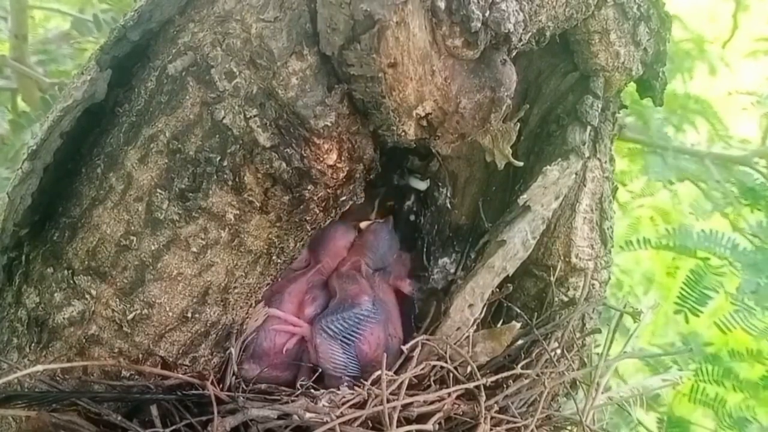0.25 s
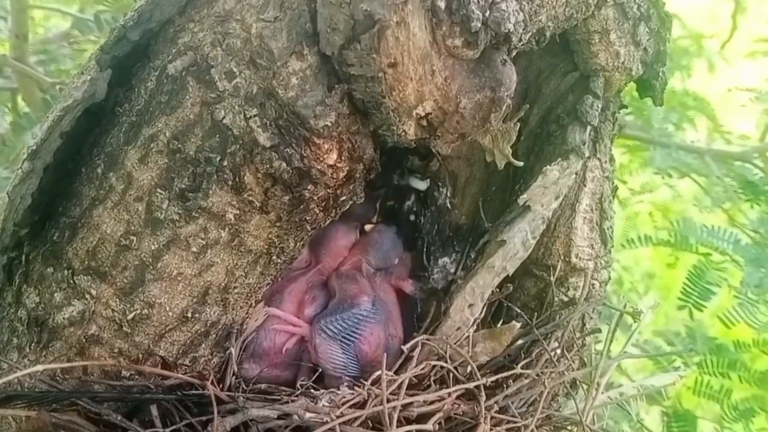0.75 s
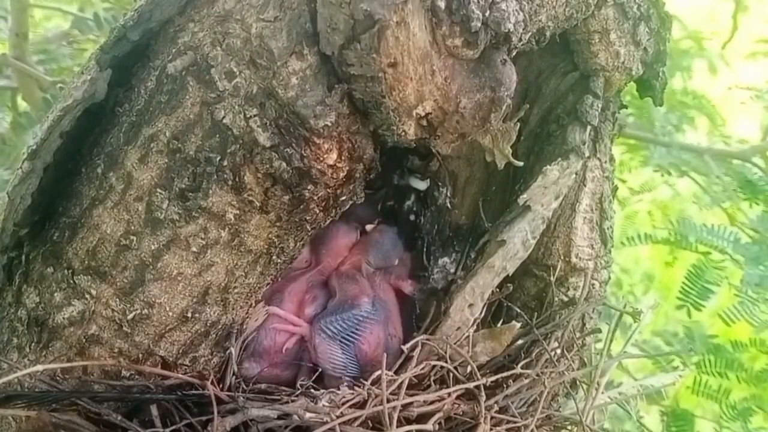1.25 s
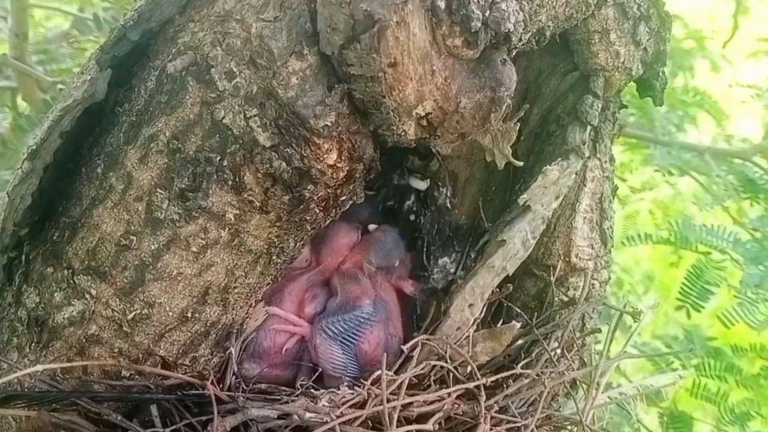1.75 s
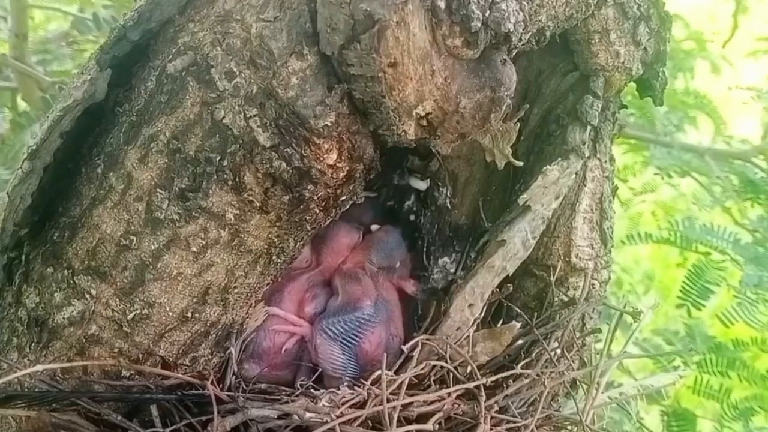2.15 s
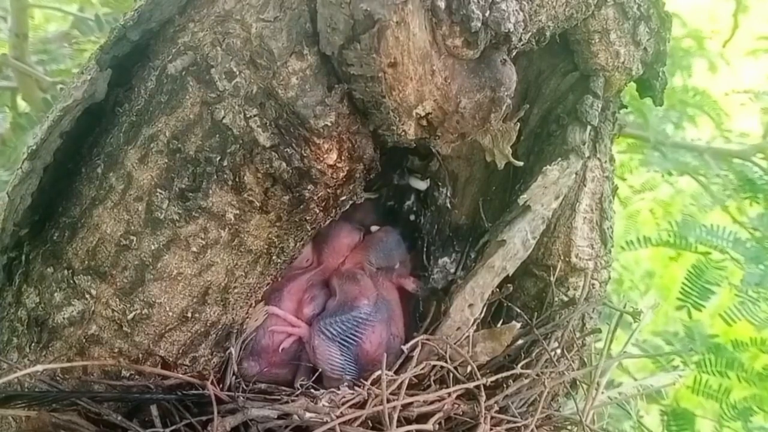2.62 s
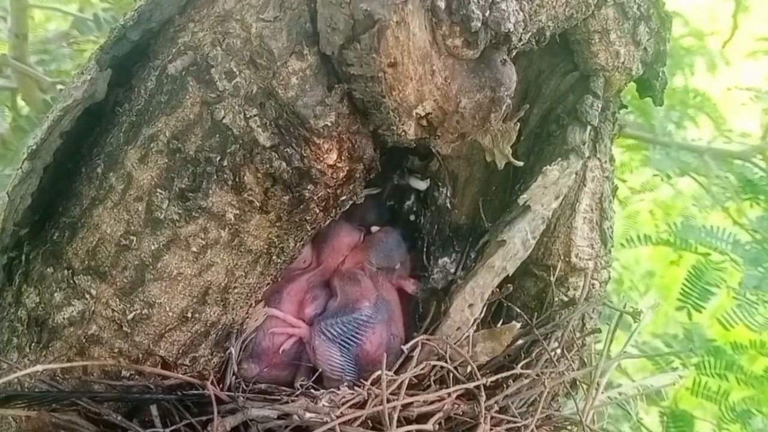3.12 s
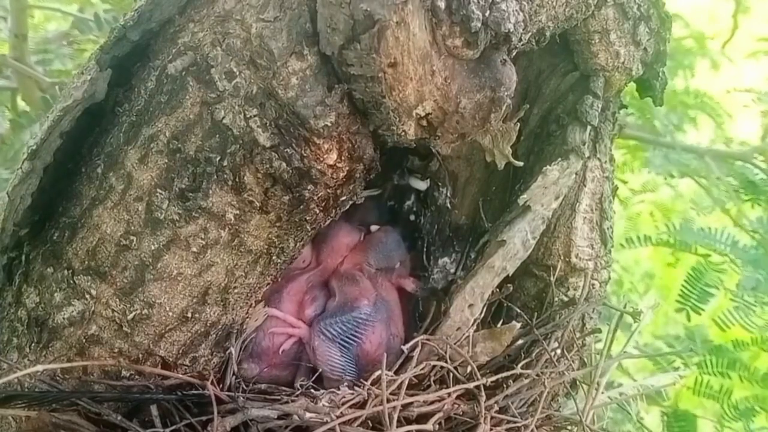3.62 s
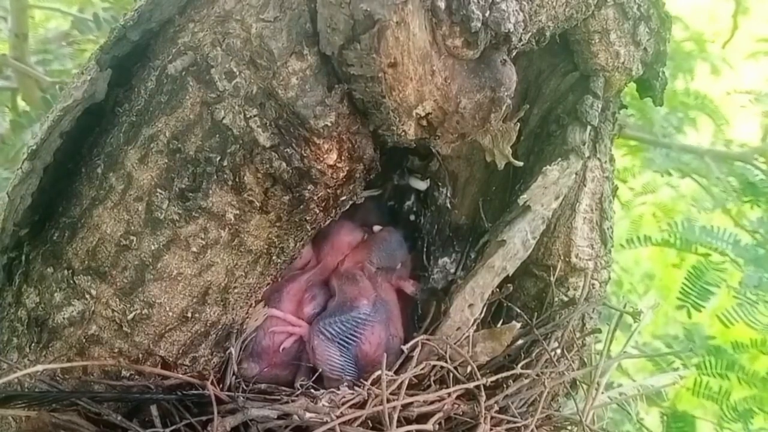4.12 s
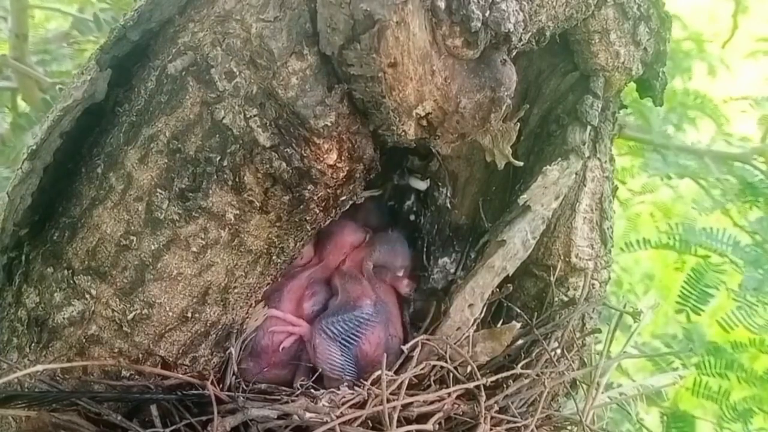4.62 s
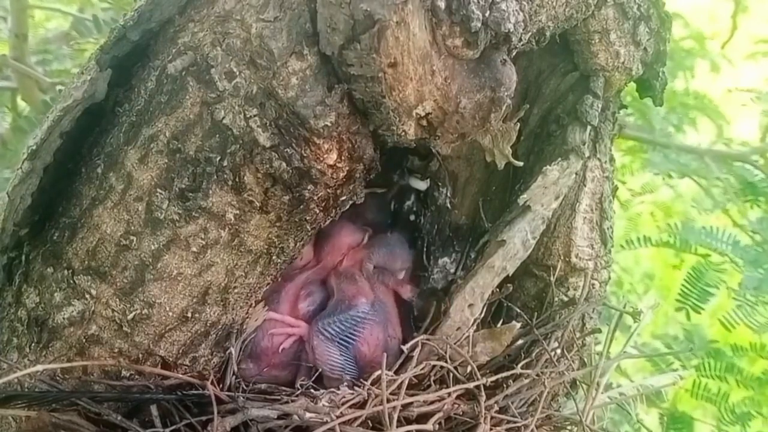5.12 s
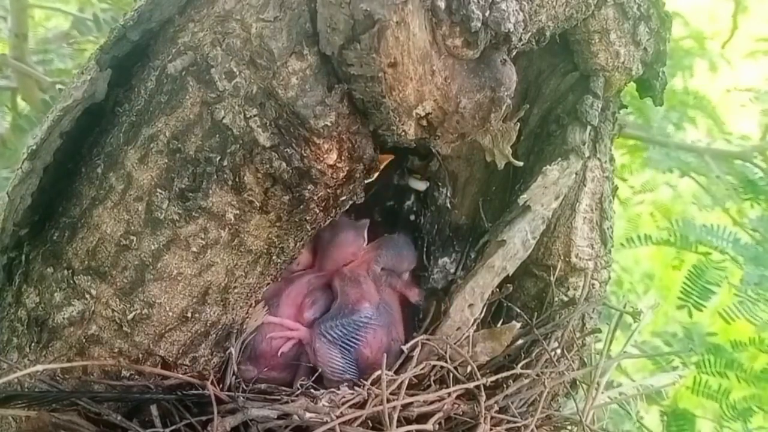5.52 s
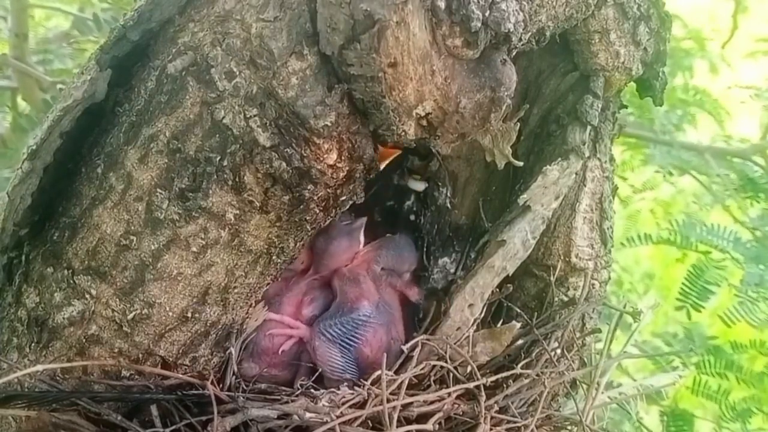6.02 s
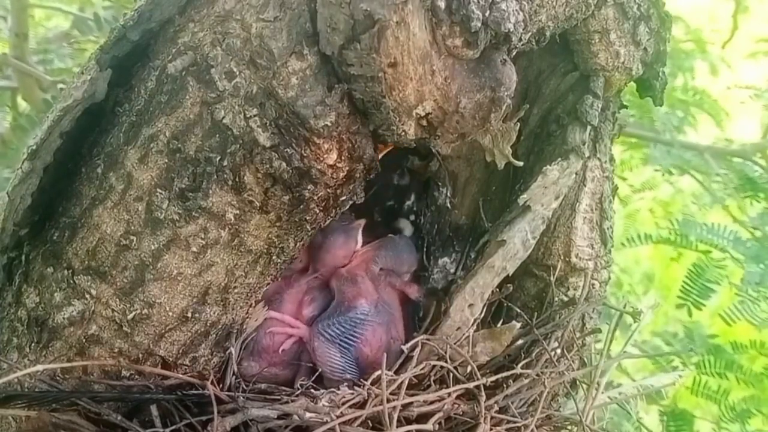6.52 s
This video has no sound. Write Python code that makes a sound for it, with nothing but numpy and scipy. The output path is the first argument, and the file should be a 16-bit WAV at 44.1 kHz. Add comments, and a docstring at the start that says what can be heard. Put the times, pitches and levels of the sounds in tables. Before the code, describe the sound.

Shrill cicadas hold a dense, steady sizzle, mixed with a rapid cricket trill and a very thin high whine. Birds come in over them: short buzzy bursts, a quick rasping chatter, then a long run of sharp repeated chirps, loudest just after its first second. Faint calls scatter among leaves behind. The microphone sits near the nest, catching low bumps and a few tiny dry twig ticks.

```python
"""Cicadas drone in a summer wood, heard from a nest in a hollow tree: streams of clicks ring in a set band.
A cricket pulses about ten times a second, as swells of clicks; a thin whine, a sine in narrow hiss, hangs above.
One bird chatters in runs of raspy notes, a higher one answers and others call farther off: their whistles
are shaken by a fast rattle and scattered by trunks and leaves. Twigs tick and scrape as brief bright noise.
Underneath lie a hush and a rumble, both shaped noise, and soft bumps made of short low tones."""
import sys
import numpy as np
from scipy import signal
from scipy.fft import rfft, irfft, next_fast_len
from scipy.io import wavfile
from scipy.ndimage import map_coordinates

SR = 44100
rng = np.random.default_rng(int(sys.argv[2]) if len(sys.argv) > 2 else 0)


def transcribe(u):
    """Save the signal u as a 16-bit wav file named by the first command-line argument.

    u: samples, shape (n,) or (channels, n), limited to [-1, 1]; the rate is SR.
    q: integer samples, one column per channel.
    """
    v = np.clip(np.atleast_2d(u).T, -1, 1)
    q = np.round(v * 32767).astype(np.int16)
    wavfile.write(sys.argv[1], SR, q)


N = 297675

# In every table a half length is the time from a sound's middle to where its swell has faded to 1/e.
# how the cicadas' bodies ring: [f/Hz, relative level/dB]
CICADA_BODY = [(5600, -65.5), (6450, -29.5), (6650, -30.5), (6790, -17), (6900, -11.5), (7150, -10),
               (7400, -6), (7680, 0), (7900, -2.5), (8200, -12.5), (8450, -24.5), (8600, -32),
               (8850, -44.5), (9100, -63)]
CHORUS_DB = -19.1
LONE_DB, LONE_FADE_DB_PER_S = -29.5, .55  # the lone cicada slowly tires
FALTERS_S, FALTER_DB, FALTER_HALF_S = [1.58, 3.64], 14, .11  # and dips deeply twice

# the cricket holds a pace for a while, then shifts: [start t/s, chirps per second]
CRICKET_PACE = [(.065, 9.85), (.776, 11.06), (1.499, 10.4), (3.902, 9.79), (4.924, 10.14), (5.811, 9.19),
                (6.246, 9.99)]
# how hard the cricket sings, before its gain: [t/s, level/dB]
CRICKET_LEVEL = [(.17, -28.5), (.45, -34), (.8, -30.5), (.96, -46), (1.06, -35), (1.55, -30), (1.95, -33.5),
                 (2.35, -30.5), (3.0, -36), (3.27, -32.5), (3.5, -38.5), (4.35, -36.5), (4.65, -33),
                 (5.7, -31.5), (6.1, -35.5), (6.75, -33)]
# how the cricket's wing rings: [f/Hz, relative level/dB]
WING = [(5500, -39.5), (5880, -13.5), (6020, -1), (6130, -1), (6240, -1), (6380, -35), (6600, -54)]
CRICKET_SPREAD_DB = 1.2  # from chirp to chirp

WHINE_HZ, WHINE_DB = 15736, -33

# the near bird's runs of raspy notes: [first note t/s, last note t/s]
CHATTER_RUNS = [(1.578, 1.85), (2.89, 5.994), (6.546, 6.722)]
# the near bird's effort, before its gain: [t/s, level/dB]
CHATTER_LEVEL = [(1.57, -35), (1.7, -29.8), (1.86, -28.3), (2.89, -32.5), (2.99, -25), (3.4, -24.5),
                 (3.78, -22.7), (4.0, -19), (4.2, -21), (5.35, -21.4), (6.0, -23), (6.75, -24)]
CHATTER_PER_S = 11.3
EASY_HZ, PUSH_ABOVE_DB, PUSH_HZ_PER_DB = 3690, -24.5, 42  # pushed harder, the notes go sharp
CHATTER_SPREAD_DB, CHATTER_SPREAD_HZ = .8, 30  # from note to note

# a second bird's bursts and single notes, before its gain: [first note t/s, length/s, level/dB, f/Hz]
ANSWERS = [(.2, 0, -47, 4670), (.49, 0, -47, 4700), (1.194, .136, -25, 4670), (2.489, .207, -24.5, 4635),
           (2.92, 0, -43.5, 4600), (3.236, 0, -38.5, 4600), (3.845, 0, -37, 4500), (4.216, .204, -26, 4650),
           (5.43, 0, -35, 4780), (5.941, 0, -32, 4620), (6.023, 0, -21, 4530), (6.536, 0, -27, 4390)]
ANSWER_PER_S = 14.6
# the far flock's calls that stand out, before their gain: [t/s, level/dB]
FAR_CALLS = [(.134, -32), (.355, -38), (.699, -35), (.769, -36), (1.223, -37.5), (1.481, -36),
             (1.852, -34.5), (2.272, -30.5), (3.039, -30), (3.386, -35), (3.596, -36), (3.805, -31),
             (4.245, -34), (4.341, -36), (4.634, -34), (4.796, -33.5), (5.197, -34.5), (5.292, -32.5),
             (5.6, -34), (5.767, -33), (5.981, -37), (6.439, -36), (6.737, -29.5)]
FAR_HZ = 3030
FLOCK_DB, FLOCK_SPREAD_DB, FLOCK_SPREAD_HZ = -42, 1.8, 110  # the rest of the flock
# scattered falling notes, before their gain: [t/s, level/dB, middle f/Hz, half length/s]
SLURS = [(.08, -36.5, 3830, .035), (.496, -40, 716, .016), (.59, -38, 3920, .045), (.686, -45, 2620, .026),
         (.83, -47, 4620, .04), (1.17, -43, 3850, .09), (1.79, -35, 3870, .03), (1.998, -40.5, 2480, .017),
         (2.44, -42.5, 3660, .04), (2.711, -39, 362, .025), (3.7, -33, 2580, .014), (3.945, -43, 360, .034),
         (4.792, -32, 3680, .018), (4.932, -39, 1730, .011), (5.528, -44, 1670, .028),
         (5.545, -39.5, 790, .028), (5.605, -39, 2360, .016), (5.706, -30, 4170, .026),
         (6.06, -47, 1620, .06), (6.17, -35.5, 4070, .04), (6.343, -31, 4190, .02),
         (6.674, -30.5, 4310, .018)]
SLUR_FALL_PER_S, SLUR_RASP = .55, .029  # both as shares of the pitch

# dry twigs of the nest tick and rustle: [t/s, level/dB, half length/s]
TWIGS = [(4.056, -33, .001), (5.427, -44, .012), (5.448, -35, .006)]
# the bright sound of the twigs: [f/Hz, relative level/dB]
TWIG_COLOUR = [(1000, -30), (4800, -27), (9200, 5), (10500, -14)]

# the wood's distant hush: [f/Hz, relative level/dB]
HUSH_COLOUR = [(20, -26), (200, 4.5), (350, 4), (450, 0), (570, -2), (760, -0.5), (1000, -1), (1550, -1),
               (1950, -6.5), (2600, -4.5), (4000, -8.5), (5200, -11), (8500, -17), (15800, -40.5)]
# the colour of the rumble: [f/Hz, relative level/dB]
RUMBLE_COLOUR = [(15, -16), (45, -21.5), (80, -13.5), (115, -5.5), (140, -1), (180, -6.5), (260, -13.5),
                 (400, -27), (800, -55.5)]
# how the rumble rises and falls, before its gain: [t/s, level/dB]
RUMBLE_LEVEL = [(0, -40.5), (1.0, -38), (1.3, -40.5), (2.2, -39), (2.55, -42), (2.95, -37), (3.3, -36),
                (3.6, -38.5), (5.0, -37.5), (5.5, -41), (6.75, -37.5)]
# the soft low bumps: [t/s, level/dB, middle f/Hz, half length/s]
BUMPS = [(0.406, -15, 123, 0.016), (0.494, -23.5, 105, 0.028), (.59, -31, 90, .014),
         (2.83, -24.5, 146, 0.027), (2.895, -17.5, 112, 0.009), (3.21, -32, 147, .021),
         (3.32, -31.5, 143, .025), (3.457, -25.5, 149, 0.019), (3.774, -20.5, 82, 0.011),
         (3.935, -27, 86, .02), (4.02, -24, 80, 0.017), (4.377, -17.5, 121, 0.014),
         (4.749, -22.5, 120, 0.009), (5.12, -27.5, 104, 0.016)]
TOP_HZ = 15870  # nothing sounds above this


def cicada_chorus():
    """Several insects buckle their ribs in streams of clicks, which ring strongest near 7.7 kHz."""
    clicks = unsteady_clicks(rate=420, scatter=.3, count=4)
    level_db = CHORUS_DB + 1.03 * wobble(80, N)
    return coloured(clicks, CICADA_BODY) * amp(level_db)


def lone_cicada():
    """One insect holds a narrower, lower note: noise squeezed into a band only 50 Hz wide."""
    ring = filtered(rng.standard_normal(N), lambda hz: resonance(hz, 7033, 50, order=2))
    t = np.arange(N) / SR
    falter = sum(np.exp(-((t - s) / FALTER_HALF_S) ** 2) for s in FALTERS_S)
    level_db = LONE_DB - LONE_FADE_DB_PER_S * t - FALTER_DB * falter
    return unit(ring) * amp(level_db)


def unsteady_clicks(rate, scatter, count):
    """Streams of clicks of random strength, each stream at its own unsteady rate."""
    clicks = np.zeros(N)
    for speed in rate * np.exp(.25 * rng.standard_normal(count)):
        gaps = np.exp(scatter * rng.standard_normal(int(2 * speed * N / SR))) / speed
        at = (np.cumsum(gaps) * SR).astype(int)
        at = at[at < N]
        strength = amp(2 * rng.standard_normal(len(at)))
        clicks += np.bincount(at, strength, N)
    return clicks - clicks.mean()


def cricket():
    """Each wing stroke scrapes a short swell of tooth strikes into a narrow resonance."""
    t, strokes = note_time(), np.zeros(N)
    ends = [s for s, _ in CRICKET_PACE[1:]] + [N / SR + t[-1]]
    for (start, per_s), end in zip(CRICKET_PACE, ends):
        # the last time of a stretch is the first of the next
        for s in run_of_notes(start, end, per_s)[:-1]:
            db = level_at(CRICKET_LEVEL, s) + CRICKET_SPREAD_DB * rng.standard_normal()
            add(strokes, s, amp(db + 4) * np.exp(-(t / .018) ** 2))
    teeth = unsteady_clicks(rate=880, scatter=.3, count=3)
    return strokes * coloured(teeth, WING)


def whine():
    """A thin tone at the top of hearing, fluttering in pitch inside its own narrow hiss."""
    def narrow_band(hz):
        return resonance(hz, WHINE_HZ, 26, order=1) * resonance(hz, WHINE_HZ, 100, order=2)
    hiss = unit(filtered(rng.standard_normal(N), narrow_band))
    fluttering = tone(WHINE_HZ + 7 * wobble(12, N))
    return amp(WHINE_DB) * unit(hiss + .6 * fluttering)


def chatter():
    """The near bird's notes start low and soft, arch up and turn harsh where loudest; no two are alike."""
    t, out = note_time(), np.zeros(N)
    times = np.concatenate([run_of_notes(first, last, CHATTER_PER_S) for first, last in CHATTER_RUNS])
    variety = np.exp(.13 * rng.standard_normal((len(times), 2)))
    for s, (stretch, lift) in zip(times, variety):
        db = level_at(CHATTER_LEVEL, s) + CHATTER_SPREAD_DB * rng.standard_normal()
        push_hz = PUSH_HZ_PER_DB * max(db - PUSH_ABOVE_DB, 0)
        hz = EASY_HZ + push_hz + CHATTER_SPREAD_HZ * rng.standard_normal()
        # a slower rise than fall
        half_length = stretch * np.where(t < 0, .022, .016)
        effort = np.exp(-np.abs(t / half_length) ** 2.13)
        arch = np.exp(-((t - .003) / .01715 / stretch) ** 2)
        pitch = hz - 130 + 280 * lift * arch
        upper = raspy_note(pitch, 75 + 85 * arch, rasp_rate=700, flutter_db=3.6, beak_hz=720)
        # the other side of the syrinx joins in, lower, at the height of the note
        lower = raspy_note(pitch - 410, rasp_hz=130, rasp_rate=870, flutter_db=3.5, beak_hz=650)
        add(out, s, amp(db + 3) * effort * (upper + amp(-5) * arch ** 2 * lower))
    return foliage(out, wet_db=-6, t60=.074)


def raspy_note(pitch_hz, rasp_hz, rasp_rate, flutter_db, beak_hz):
    """A whistle shaken by an irregular rattle of the syrinx; throat and beak pass a band beak_hz wide."""
    size = len(pitch_hz)
    flutter = amp(flutter_db * np.minimum(wobble(rasp_rate, size), 1))  # the syrinx opens only so far
    whistle = tone(pitch_hz + rasp_hz * wobble(rasp_rate, size)) * flutter
    middle_hz = np.mean(pitch_hz[size * 2 // 5:size * 3 // 5])
    band = resonance(np.fft.rfftfreq(size, 1 / SR), middle_hz, beak_hz, order=5)
    return unit(irfft(rfft(whistle) * band, size))


def buzzes(rows, gain_db, half_length, rasp_hz, rasp_rate, beak_hz):
    """Buzzy notes on a level pitch, each with a flat-topped swell."""
    t, out = note_time(), np.zeros(N)
    swell = np.exp(-(t / half_length) ** 4)
    for s, db, hz in rows:
        note = raspy_note(np.full(len(t), hz), rasp_hz, rasp_rate, flutter_db=7, beak_hz=beak_hz)
        add(out, s, amp(db + gain_db) * swell * note)
    return out


def answering_bird():
    """A higher bird answers in bursts and single notes of level, buzzy pitch."""
    notes = []
    for first, length, db, hz in ANSWERS:
        notes += [(s, db, hz) for s in run_of_notes(first, first + length, ANSWER_PER_S)]
    answer = buzzes(notes, gain_db=-1, half_length=.023, rasp_hz=185, rasp_rate=710, beak_hz=520)
    return foliage(answer, wet_db=-15, t60=.13)


def far_calls():
    """Buzzy calls come through the leaves with a longer scattered tail."""
    calls = [(s, db, FAR_HZ) for s, db in FAR_CALLS]
    far = buzzes(calls, gain_db=2, half_length=.026, rasp_hz=119, rasp_rate=500, beak_hz=375)
    return foliage(far, wet_db=-13.5, t60=.58)


def slurred_notes():
    """Scattered raspy whistles slide down in pitch as they sound."""
    t, slurs = note_time(), np.zeros(N)
    for s, db, hz, half_length in SLURS:
        pitch = hz * (1 - SLUR_FALL_PER_S * t)
        note = raspy_note(pitch, SLUR_RASP * hz, rasp_rate=hz / 9, flutter_db=3.3, beak_hz=700)
        add(slurs, s, amp(db + 3.5) * np.exp(-(t / half_length) ** 2) * note)
    return foliage(slurs, wet_db=-9.5, t60=.04)


def flock(count):
    """Many faint calls of the same far birds run together into a twitter."""
    chance = rng.standard_normal((count, 3))
    s = (np.arange(count) + .2 * chance[:, 0]) * N / SR / count
    db = FLOCK_DB + FLOCK_SPREAD_DB * chance[:, 1]
    hz = FAR_HZ + FLOCK_SPREAD_HZ * chance[:, 2]
    calls = np.column_stack([s, db, hz])
    twitter = buzzes(calls, gain_db=0, half_length=.028, rasp_hz=110, rasp_rate=450, beak_hz=480)
    return foliage(twitter, wet_db=-8, t60=.2)


def foliage(x, wet_db, t60):
    """The direct sound and its dying scatter from trunks and leaves, which shifts as they sway."""
    hop = SR // 2  # a new scatter pattern every half second
    t, out = np.arange(hop) / SR, x.copy()
    for start in range(0, N, hop):
        tail = rng.standard_normal(hop) * amp(-60 * t / t60)  # 60 dB down after t60 seconds
        echo = signal.fftconvolve(x[start:start + hop], tail / np.linalg.norm(tail))[:N - start]
        out[start:start + len(echo)] += amp(wet_db) * echo
    # the leaves swallow the treble; the band also ends at 100 Hz below
    muffled = filtered(out, lambda hz: resonance(hz, 2700, 5200, order=12))
    return muffled / np.sqrt(1 + amp(wet_db) ** 2)


def twigs():
    """Brief, bright scrapes of dry nest material: short swells of shaped noise."""
    t, touches = note_time(), np.zeros(N)
    for s, db, half_length in TWIGS:
        add(touches, s, amp(db) * np.exp(-(t / half_length) ** 2))
    return touches * coloured(rng.standard_normal(N), TWIG_COLOUR)


def bumps():
    """Soft low thuds: short swells of a tone with an unsteady pitch."""
    t, out = note_time(), np.zeros(N)
    for s, db, hz, half_length in BUMPS:
        thud = tone(hz * np.exp(.18 * wobble(110, len(t))))
        add(out, s, amp(db) * np.exp(-(t / half_length) ** 2) * thud)
    return out


def rumble():
    """Low noise that wavers around a slow level curve."""
    level_db = level_at(RUMBLE_LEVEL, np.arange(N) / SR) + 1 + 1.7 * wobble(14, N)
    return amp(level_db) * coloured(rng.standard_normal(N), RUMBLE_COLOUR)


def hush():
    """The distant hush of the wood: broad noise with a slight flicker in level."""
    level_db = -41 + .7 * wobble(30, N)
    return amp(level_db) * coloured(rng.standard_normal(N), HUSH_COLOUR)


def amp(db):
    """Turn decibels into a factor."""
    return 10 ** (np.asarray(db) / 20)


def unit(x):
    """Scale a sound to an rms (average strength) of 1."""
    return x / np.sqrt(np.mean(x ** 2) + 1e-20)


def level_at(rows, s):
    """Read a two-column table at time s, with straight lines between its rows."""
    return np.interp(s, *np.transpose(rows))


def wobble(rate, size):
    """A smooth random curve through rate random points a second."""
    knots = np.arange(size) * rate / SR
    coarse = np.arange(0, knots[-1] + 1, .125)
    points = rng.standard_normal(int(knots[-1]) + 5)
    return np.interp(knots, coarse, map_coordinates(points, [coarse + 1]))


def filtered(x, response):
    """Strengthen or weaken each frequency of x by the given response."""
    size = next_fast_len(N + SR // 2)
    return irfft(rfft(x, size) * response(np.fft.rfftfreq(size, 1 / SR)), size)[:N]


def coloured(x, points):
    """Shape x by a table of frequencies and decibels, then bring it to rms 1."""
    f, db = np.transpose(points)

    def response(hz):
        return amp(np.interp(np.log(hz + 1), np.log(f), db, right=-120))
    return unit(filtered(x, response))


def resonance(hz, centre_hz, width_hz, order):
    """The gain of a pass band; a higher order gives steeper sides."""
    return 1 / np.sqrt(1 + np.abs(2 * (hz - centre_hz) / width_hz) ** (2 * order))


def tone(hz):
    """A sine of rms 1 that follows a pitch curve from a random starting phase."""
    return np.sqrt(2) * np.sin(2 * np.pi * (np.cumsum(hz) / SR + rng.random()))


def add(track, s, sound):
    """Mix a sound in, centred on time s."""
    at = round(s * SR) - len(sound) // 2 + np.arange(len(sound))
    inside = (at >= 0) & (at < N)
    track[at[inside]] += sound[inside]


def note_time():
    """Seconds around the middle of a note, from -0.1 to 0.1."""
    return np.arange(-SR // 10, SR // 10) / SR


def run_of_notes(first, last, per_s):
    """Evenly spaced note times from first to last, about per_s a second."""
    return np.linspace(first, last, round(abs(last - first) * per_s) + 1)


def scene():
    """All the insects, birds and background sounds together."""
    insects = cicada_chorus() + lone_cicada() + cricket()
    birds = chatter() + answering_bird() + far_calls() + slurred_notes() + flock(count=80)
    background = twigs() + bumps() + rumble() + hush()
    return (insects + whine() + birds + background)[None]


def record(dry):
    """Keep only the sound below the upper band limit."""
    return filtered(dry[0], lambda hz: hz < TOP_HZ)[None]


dry = scene()
out = record(dry)
transcribe(out)
```